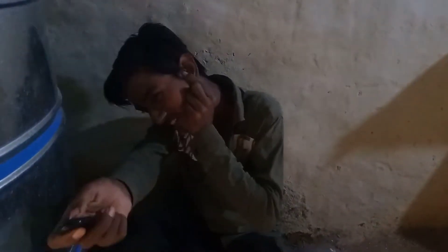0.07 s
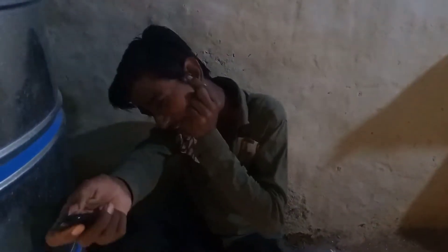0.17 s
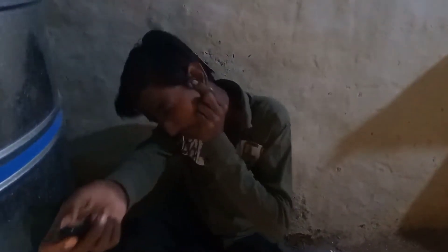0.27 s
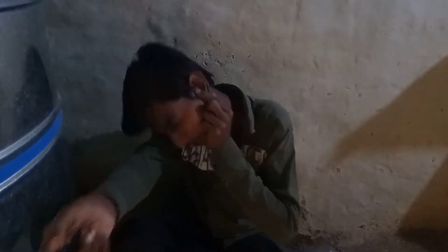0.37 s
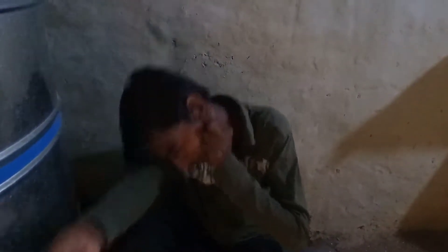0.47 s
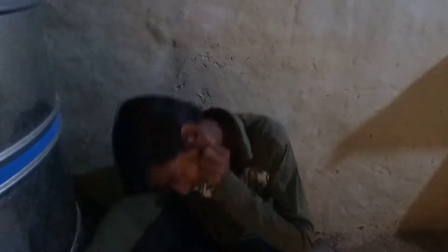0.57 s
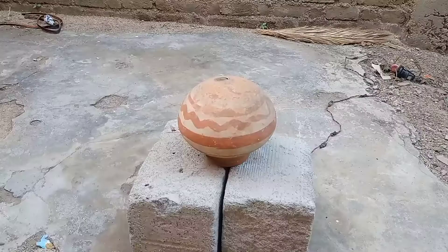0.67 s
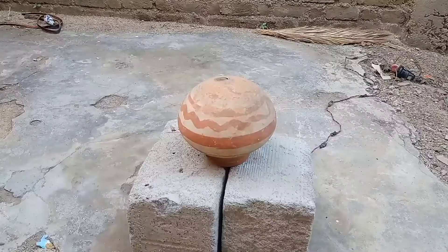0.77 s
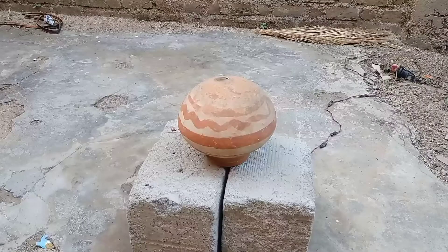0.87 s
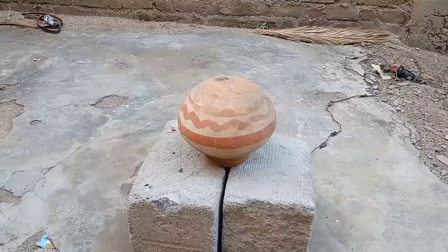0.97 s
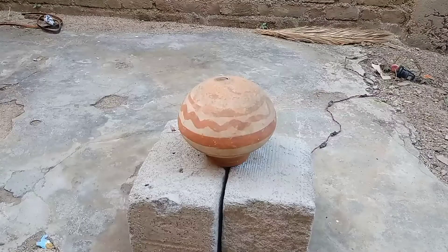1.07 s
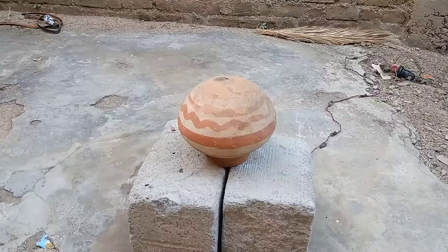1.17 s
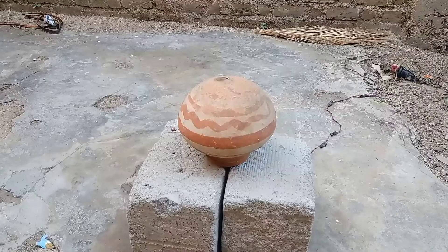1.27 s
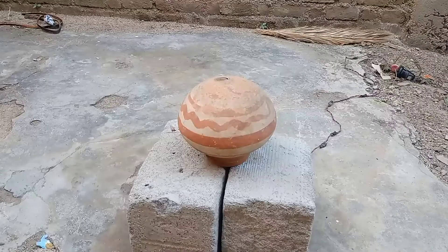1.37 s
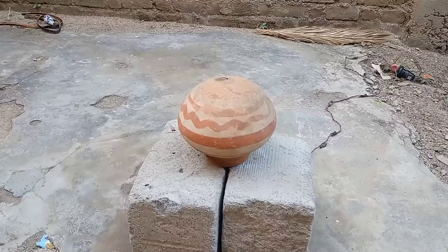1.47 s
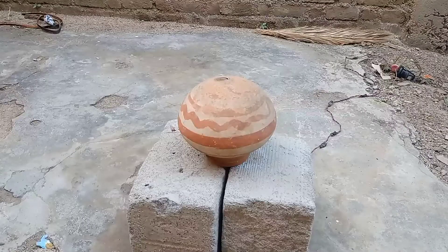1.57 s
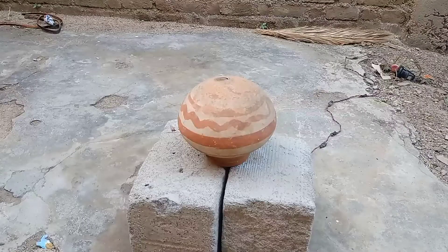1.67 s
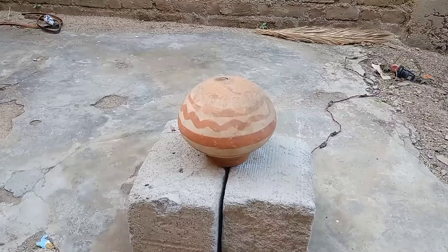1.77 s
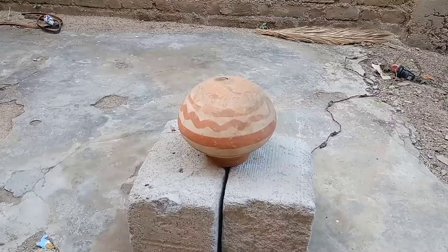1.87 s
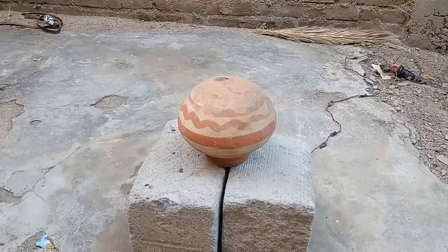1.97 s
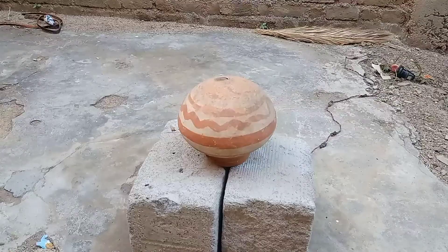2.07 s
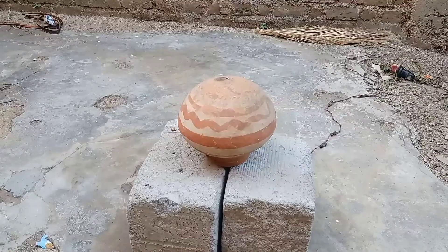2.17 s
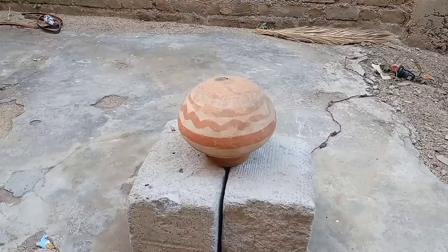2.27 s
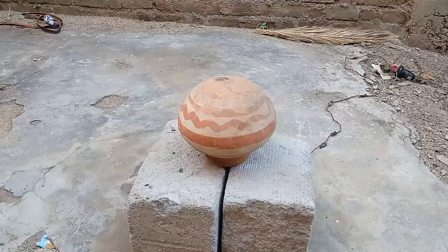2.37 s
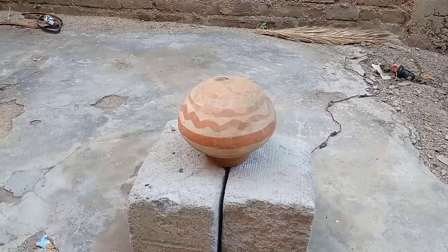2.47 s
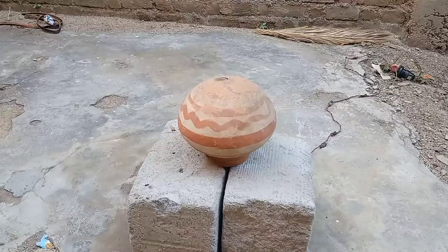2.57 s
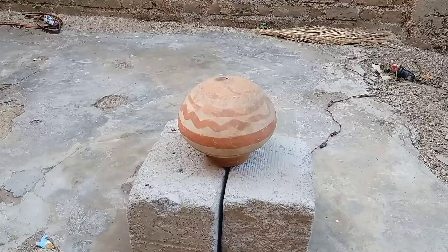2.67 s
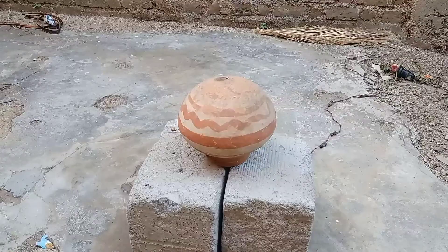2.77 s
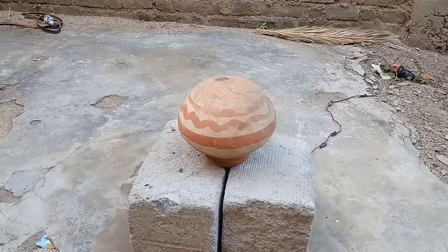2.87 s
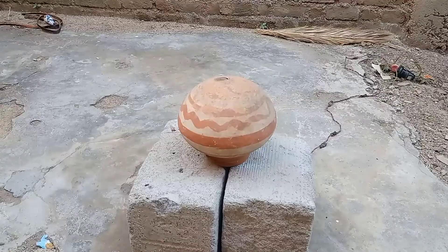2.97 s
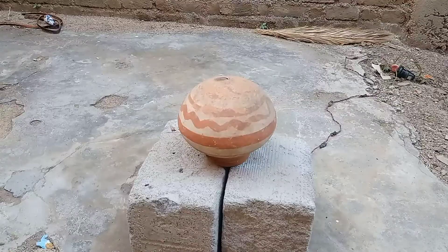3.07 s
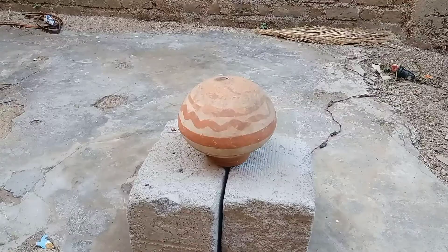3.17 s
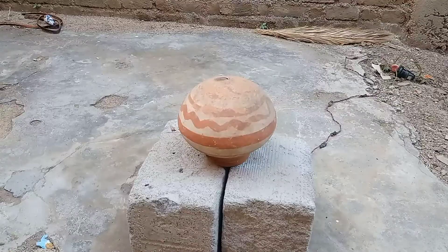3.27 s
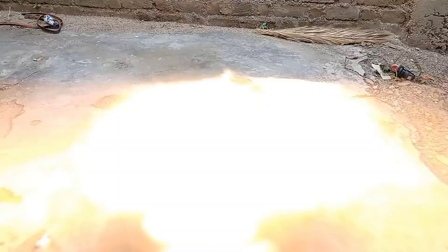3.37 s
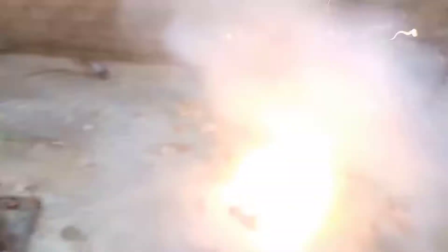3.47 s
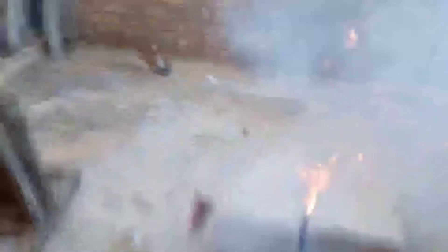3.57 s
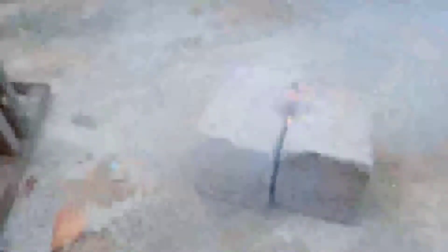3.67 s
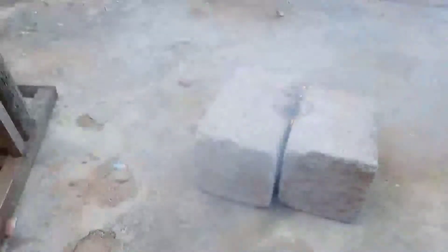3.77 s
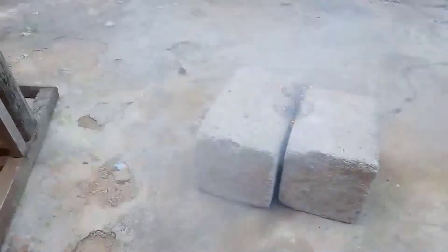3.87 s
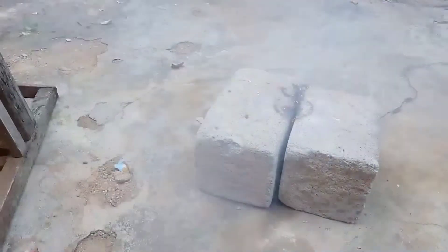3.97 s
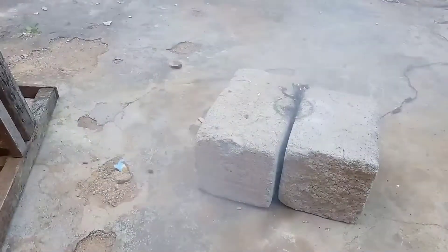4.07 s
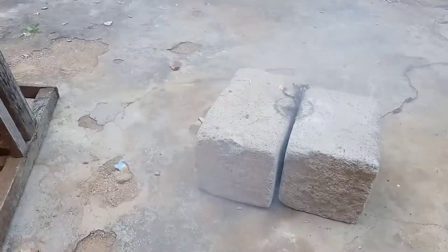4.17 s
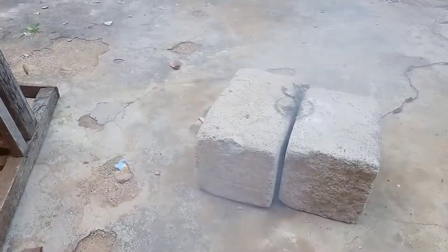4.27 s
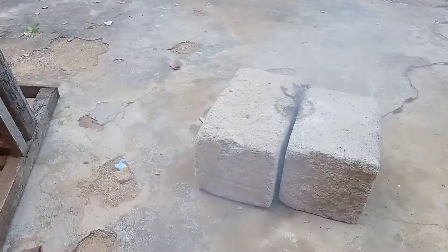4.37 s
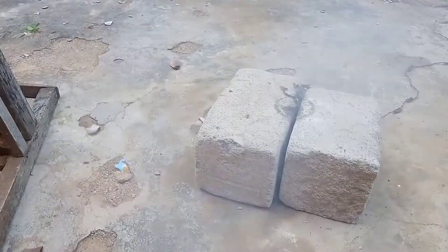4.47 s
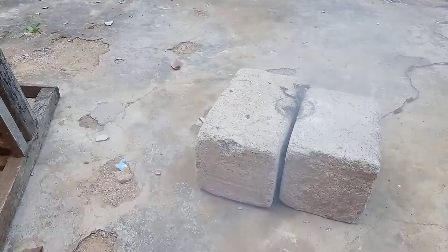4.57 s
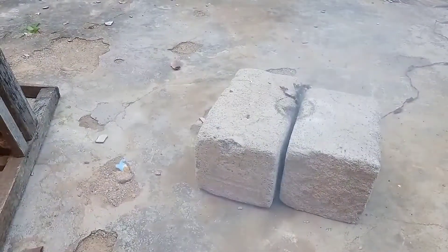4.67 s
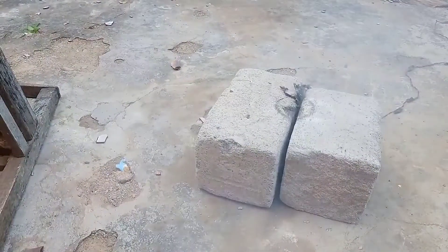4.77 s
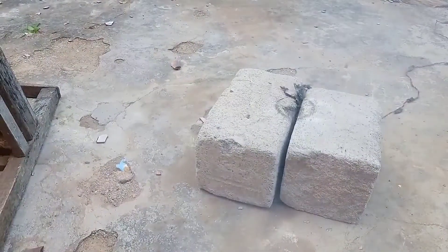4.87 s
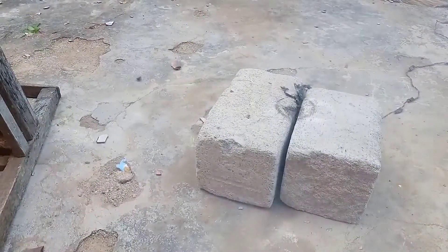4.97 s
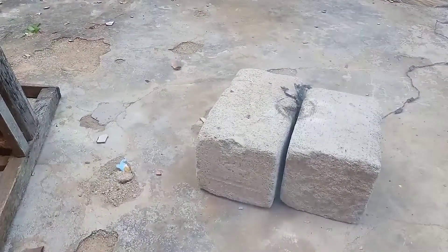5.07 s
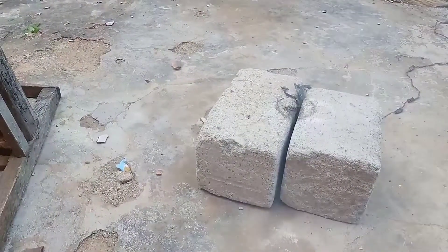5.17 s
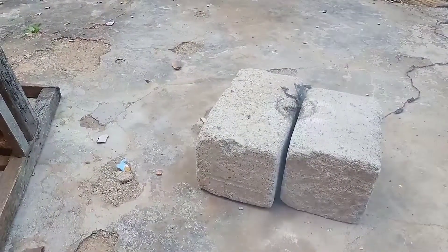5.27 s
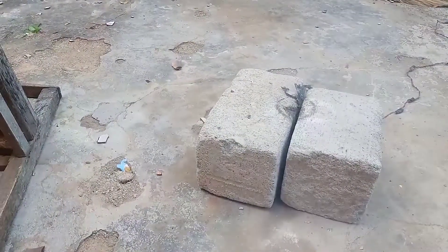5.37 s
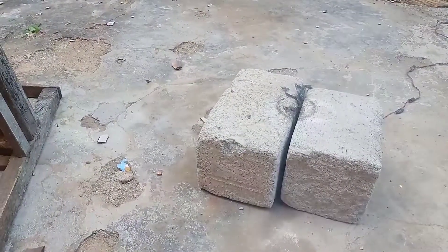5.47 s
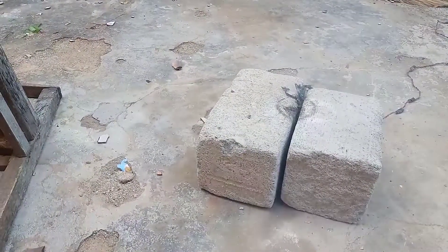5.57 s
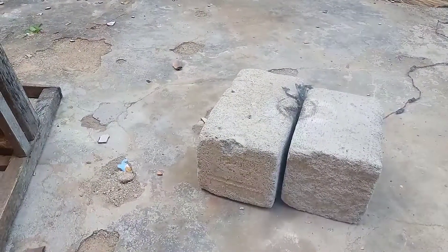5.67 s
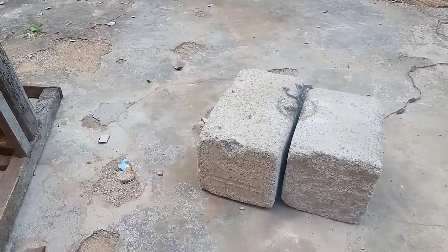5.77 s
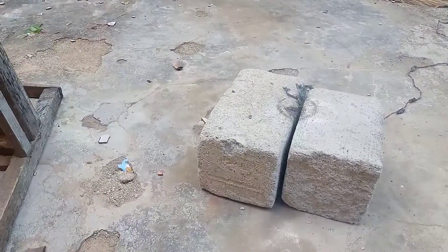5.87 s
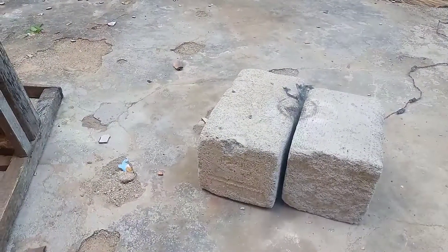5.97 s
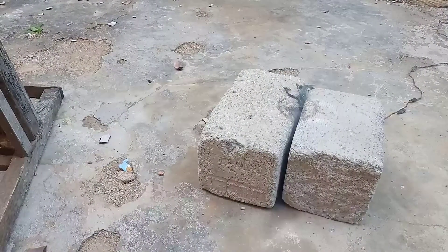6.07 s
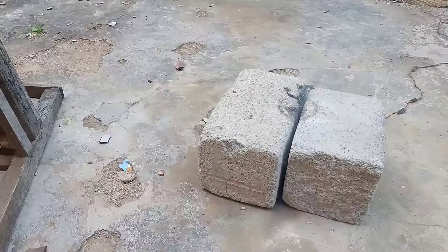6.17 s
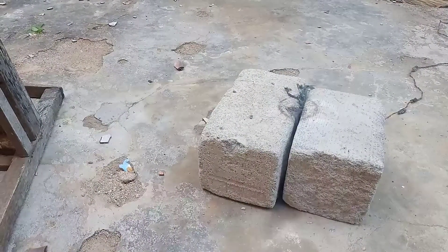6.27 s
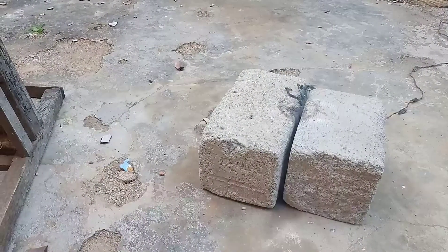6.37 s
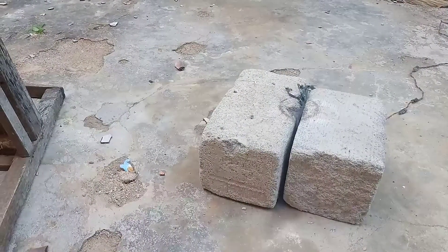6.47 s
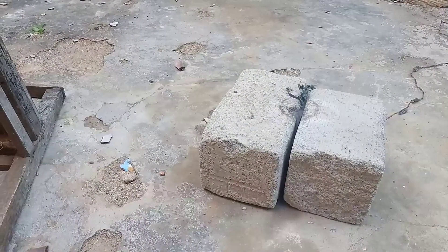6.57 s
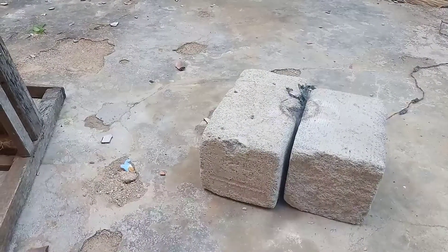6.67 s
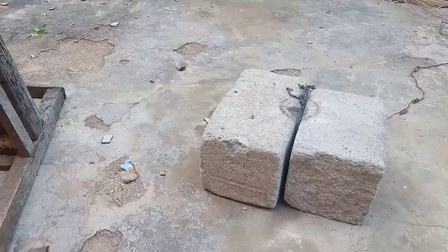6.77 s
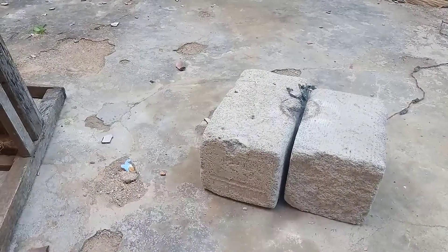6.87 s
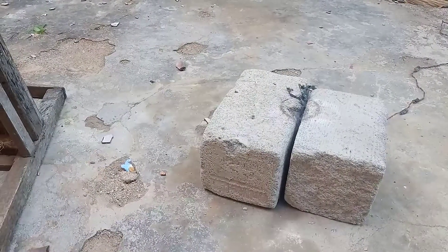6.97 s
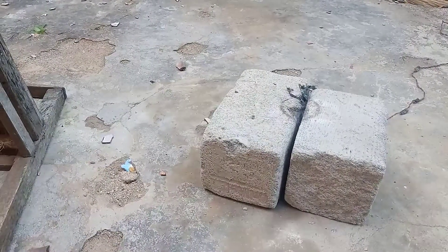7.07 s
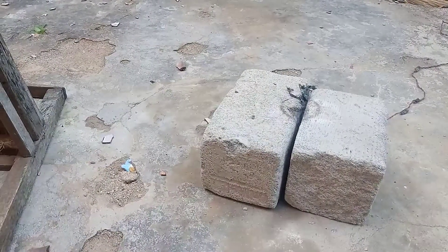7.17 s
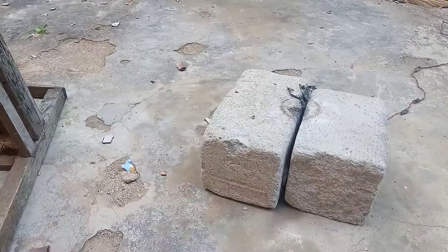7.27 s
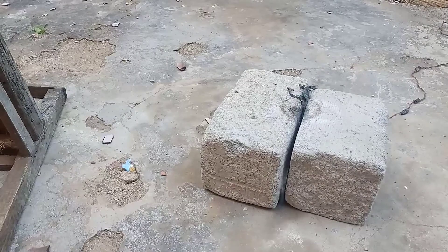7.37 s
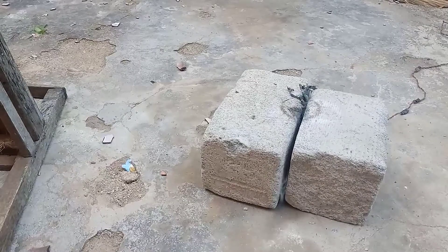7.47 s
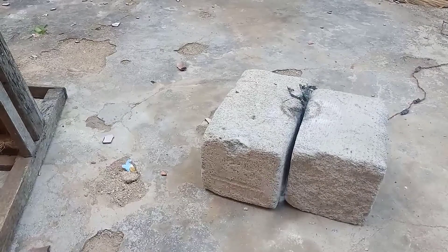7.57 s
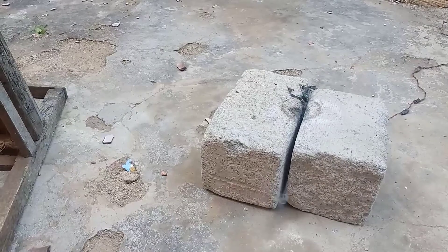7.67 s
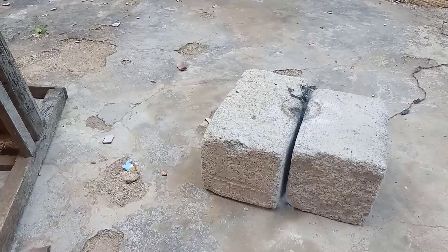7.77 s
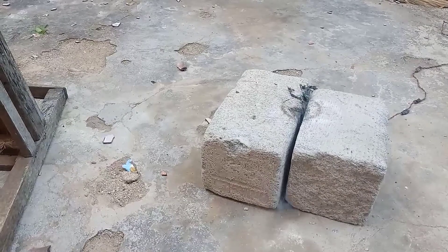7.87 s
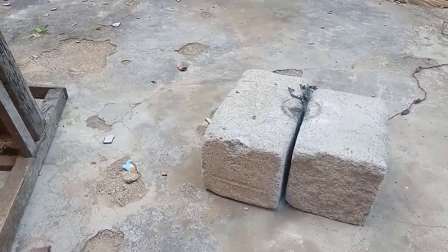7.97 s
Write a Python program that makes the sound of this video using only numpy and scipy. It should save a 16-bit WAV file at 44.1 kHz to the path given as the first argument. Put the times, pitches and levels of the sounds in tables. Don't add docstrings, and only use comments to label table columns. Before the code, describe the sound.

Soft sparrow trills and rubbing cloth for under a second, then an abrupt change to a quiet walled yard with shuffling feet and faint low hums of air in a pipe. A distorted firecracker blast shatters a clay pot, roaring and booming off the walls. Shards skid over concrete and slam a tin roof amid grit and sand, thinning to one last bouncing piece. One fairly close recorder overloads.

```python
import sys
import numpy as np
from scipy import signal
from scipy.io import wavfile
from scipy.ndimage import uniform_filter1d

SR = 44100
rng = np.random.default_rng(int(sys.argv[2]) if len(sys.argv) > 2 else 0)


def to_wav(sig):
    pcm = np.clip(np.atleast_2d(sig), -1, 1) * 32767
    pcm = np.round(pcm).astype(np.int16)
    wavfile.write(sys.argv[1], SR, pcm.T)


def decibels_to_gain(level_db):
    exponent = np.asarray(level_db, float) / 20
    return 10 ** exponent


N = 352888
STEP = 16
T, SLOW_T = np.arange(N) / SR, np.arange(0, N, STEP) / SR
MOVE_S, BLAST_S = .923, 3.549
MOVE = int(MOVE_S * SR)


def rms_one(x):
    return x / np.sqrt(np.mean(x ** 2) + 1e-20)


def level_curve(rows, t=T):
    s, level_db = np.transpose(rows)
    return np.interp(t, s, level_db, -200, -200)


def resonance(x, hz, width_hz):
    r = np.exp(-np.pi * width_hz / SR)
    top = np.array([1, 0, -1]) * (1 - r * r) / 2
    return signal.lfilter(top, [1, -2 * r * np.cos(2 * np.pi * hz / SR), r * r], x + 1e-18)


def hum(air, modes):
    out = 0
    for hz, width_hz, level_db in modes:
        tone = resonance(resonance(air, hz, width_hz), hz, width_hz)
        out = out + decibels_to_gain(level_db) * rms_one(tone)
    return out


def tilt_db(hz, middle_db, lows_db, highs_db, rumble_db):
    rumble = np.clip(np.log(160 / hz) / 0.083, 0, 1)
    low = np.clip(np.log(720 / hz) / 0.21, 0, 1) - rumble
    high = np.clip(np.log(hz / 2700) / 0.8, 0, 1)
    middle = 1 - rumble - low - high
    return middle_db * middle + lows_db * low + highs_db * high + (rumble_db + 6.5) * rumble


def layer_power(level_db, hz, tint):
    return decibels_to_gain(level_db + tilt_db(hz, *tint) - 9) ** 2


def landings(table, hz, rise_s, thud_db):
    power = np.zeros(len(SLOW_T))
    own_db = 2.2 * rng.standard_normal(len(table))
    for (s, peak_db, highs_db, top_hz, t60), extra_db in zip(table, own_db):
        lows_db = thud_db + 10 * np.log2(1500 / top_hz)
        fade_s = max(t60, .01) * (1500 / hz) ** 0.0097
        i = int(s * SR / STEP)
        age = SLOW_T[i:i + int(fade_s * SR / STEP)] - SLOW_T[i]
        focus_db = -4.0 * min(np.log2(hz / top_hz) ** 2, 2.6)
        colour_db = tilt_db(hz, 0, lows_db + 8.5, highs_db + 12.5, lows_db - 8.0)
        level_db = peak_db - 15.0 + extra_db + focus_db + colour_db
        heard = (s > MOVE_S) | (s + age < MOVE_S)
        power[i:i + len(age)] += decibels_to_gain(level_db - 60 * age / fade_s) ** 2 * (1 - np.exp(-age / rise_s)) ** 2 * heard
    return power


def ring_pairs(rows):
    out = np.zeros(N)
    for s, peak_db, hz, t60 in rows:
        age = np.arange(int(t60 * SR)) / SR
        pair = np.sin(2 * np.pi * hz * age) + 0.78 * np.sin(2 * np.pi * hz * 1.045 * age)
        heard = (s > MOVE_S) | (s + age < MOVE_S)
        shape = decibels_to_gain(peak_db - 6.5 - 60 * age / t60) * (1 - np.exp(-age / 0.0008)) * heard
        out[int(s * SR):int(s * SR) + len(age)] += pair * shape
    return out


# time_s, level_db
FAR_FLOCK = [(0.0, -43), (.112, -54.5), (.284, -53), (.48, -56), (.608, -49), (.758, -53), (.868, -58),
             (.9, -64)]


def far_flock():
    modes = [(3220, 740, -1.5), (2020, 350, -5)]   # pitch_hz, width_hz, level_db
    return decibels_to_gain(level_curve(FAR_FLOCK)) * hum(rng.standard_normal(N), modes)


# time_s, level_db
RUSTLE = [(0.0, -49.5), (0.138, -54.5), (0.284, -53.5), (0.514, -56.5), (0.634, -47), (0.738, -39),
          (0.848, -52.5), (0.92, -47)]
# time_s, level_db
YARD_AIR = [(0.93, -56), (1.12, -53.5), (1.24, -37), (1.32, -44.5), (1.5, -55.5), (1.74, -62.5),
            (3.5, -63.5), (5.9, -44.5), (7.2, -61.5), (8.01, -60.5)]
# time_s, level_db
WIND = [(0, -65), (.2, -55), (.55, -62), (.8, -49), (1.3, -59), (1.6, -63), (2.07, -63), (2.3, -54.5),
        (2.64, -61), (3.5, -66), (4.9, -57.5), (5.54, -34.5), (5.9, -58), (7, -73), (8.01, -67)]


def rustle_air_and_wind(hz):
    power = layer_power(level_curve(RUSTLE, SLOW_T), hz, (-1, 0, -19, -20))
    power = power + layer_power(level_curve(YARD_AIR, SLOW_T), hz, (-1.5, -1, -16.5, -5.5))
    return power + layer_power(level_curve(WIND, SLOW_T), hz, (-56, -23, -60, -1))


# start_s, length_s, pitch_hz, level_db
TRILLS = [
    (0.18, 0.078, 2300, -49),
    (0.413, 0.074, 2282, -41),
    (0.677, 0.054, 2286, -37.5),
]
# start_s, length_s, from_hz, to_hz, level_db
SWEEPS = [(0.155, 0.014, 2540, 3650, -48), (0.175, .045, 4650, 4070, -62), (0.213, 0.055, 4050, 2810, -43),
          (0.411, 0.014, 2580, 3730, -41), (0.467, .011, 4110, 3400, -39.5),
          (0.476, 0.052, 4000, 2590, -40), (.673, .013, 2700, 3600, -47), (0.714, .012, 4200, 3700, -48),
          (0.732, 0.012, 3320, 3340, -44), (0.743, 0.048, 3650, 2900, -41.5), (0.49, 0.04, 5400, 4600, -64),
          (0.23, 0.04, 5400, 4900, -66)]


def sparrows():
    notes = [(s, length, hz, .95 * hz, db, .83) for s, length, hz, db in TRILLS]
    notes += [(*row, .15) for row in SWEEPS]
    out = np.zeros(N)
    for s, length, from_hz, to_hz, db, trill in notes:
        age = np.arange(int(length * SR)) / SR
        unsteady_hz = 320 * uniform_filter1d(rng.standard_normal(len(age)), size=60)
        wobble_hz = 100 * trill * np.sin(2 * np.pi * 95 * age) + unsteady_hz
        phase = 2 * np.pi * np.cumsum(from_hz + (to_hz - from_hz) * age / length + wobble_hz) / SR
        shape = np.sin(np.pi * age / length) ** 0.71 * (1 - 0.5 * trill * np.cos(np.pi * 95 * age) ** 2)
        voice = np.sin(phase) + 0.11 * np.sin(phase / 2)
        voice = voice + 0.015 * np.sin(phase * 3 / 2) + 0.012 * np.sin(phase * 2)
        out[int(s * SR):int(s * SR) + len(age)] += decibels_to_gain(db + 4.5) * shape * voice
    out = out + 0.11 * np.roll(out, 530) - 0.09 * np.roll(out, 1150)
    tail_s = np.arange(SR // 4) / SR
    walls = rng.standard_normal(SR // 4) * decibels_to_gain(-34 - 60 * tail_s / 0.26)
    out[:MOVE] += signal.fftconvolve(out[:SR], walls)[:MOVE]
    return out


# start_s, peak_db, pitch_hz, t60_s
KNOCKS = [(3.55, 4, 205, 0.083), (3.748, -41, 13700, 0.25), (3.665, -3, 345, .28), (3.675, -4, 425, .3),
          (3.61, -1, 385, .2), (3.7, -14, 1000, .3), (3.76, -14, 380, .5), (3.635, 7.5, 720, 0.11),
          (4.783, -9, 3280, 0.15), (.27, -46.5, 299.4, 1.2), (.908, -23.5, 494, 0.33), (.912, -30, 870, .1),
          (1.008, -30.5, 1223, 0.07), (1.15, -34, 840, 0.067), (1.238, -33, 286.6, 0.43),
          (1.43, -41.5, 270, 0.3), (2.254, -41, 284.5, 0.66), (2.34, -29.5, 203.4, 0.25),
          (4.128, -6.5, 300, 0.086), (4.9, -6, 767, 0.037), (4.358, -16, 306, 0.076), (3.69, -5, 300, .2),
          (3.66, -5, 500, .3), (3.7, -8, 640, .25), (6.039, -30, 3100, .03), (6.134, -30, 2700, .03),
          (6.297, -34, 3300, .03), (6.32, -36, 2900, .03), (4.87, -12, 310, 0.28), (5.215, -4, 2900, 0.09),
          (5.259, -7.5, 322, 0.023), (3.655, 2, 601, .2), (5.715, -16, 503, 0.21),
          (5.716, -10.5, 942, 0.36), (5.715, -9, 1360, 0.28), (7.5, -41.5, 460, 0.13),
          (3.655, -14, 91, 1.4), (5.78, -10.5, 808, 0.23), (3.925, -14, 2504, 0.22), (1.24, -17, 3200, .04),
          (4.858, -9.5, 377, .2), (4.858, -9, 587, 0.197), (4.862, -13, 228, .15), (5.259, -5.5, 900, .03),
          (5.259, -8, 1900, .03), (4.716, -10, 2200, .05), (4.802, -6, 1100, .02), (4.821, -7, 2000, .03)]


def knocks():
    return ring_pairs(KNOCKS)


# start_s, peak_db, brightness_db, loudest_hz, t60_s
SHUFFLES = [(.549, -27, -11.5, 2640, 0.18), (.772, -26, -17.5, 2730, 0.16), (.896, -19.5, -29, 310, 0.086),
            (.909, -15.5, -30.5, 500, 0.25), (1.009, -48, -33, 1200, .25), (1.148, -26, -32, 765, 0.46),
            (1.235, -16, -20.5, 640, 0.23), (1.41, -38, -33, 301, 0.16), (1.494, -40, -29, 1330, 0.34),
            (1.757, -36, -26, 606, 0.38), (1.879, -39, -28, 466, 0.19), (2.25, -40, -34, 580, 0.75),
            (2.311, -36.5, -29, 784, 0.35), (2.78, -56, -15, 1330, 1), (7.09, -54.5, -37, 179, 0.43),
            (1.045, -49, -12, 3000, .3)]


def shuffles(hz):
    return landings(SHUFFLES, hz, rise_s=0.00032, thud_db=-27.5)


# start_s, peak_db, brightness_db, loudest_hz, t60_s
SKIDS = [(.665, -38, -32, 1200, 0.57), (1.109, -20, -23, 900, 0.3), (3.914, -3, -24.5, 2630, 0.18),
         (4.103, -6.5, -18, 2630, 0.15), (4.17, -0.5, -19.5, 2297, 0.11), (4.466, -15.5, -19, 2350, 1),
         (5.062, -7, -38, 1040, 0.99), (5.521, -5, -22, 1520, 0.26), (5.843, -8.5, -20, 2000, 0.21),
         (6.652, -40, -17, 1836, 1), (7.04, -37, -19, 3280, 0.37)]


def skids(hz):
    return landings(SKIDS, hz, rise_s=0.0079, thud_db=-29.5)


# peak_s, level_db, overblowing_db, fade_db_per_s
PUFFS = [(1.03, -54.5, -3, 40), (1.34, -43, -7.5, 58), (1.529, -41, -12, 200), (1.81, -50, -15, 56),
         (2.09, -48.5, -4, 193), (2.39, -46.5, -12, 148), (2.64, -55.5, -13, 248), (2.8, -54.5, 0.5, 73),
         (2.91, -56, -27, 137), (3.42, -64, -12, 84)]
# time_s, level_db
WHISTLE = [(.93, -92), (1.5, -90), (1.75, -82), (1.95, -91), (2.08, -84), (2.2, -92), (2.38, -80),
           (2.5, -92), (2.74, -95), (2.8, -79), (3.0, -82.5), (3.3, -81), (3.34, -92), (3.549, -92)]
# pitch_hz, width_hz, level_db
PIPE_MIDDLE = [
    (1310, 110, 0),
    (2440, 91, -10.5),
]
# pitch_hz, width_hz, level_db
PIPE_HIGH = [(4690, 140, 0), (5180, 200, 3), (8300, 500, -4), (12000, 600, -8), (13300, 1000, -6)]


def pipe():
    low, middle = 0, 0
    for s, db, over_db, fade in PUFFS:
        puff = decibels_to_gain(db - np.where(T < s, 290 * (s - T), fade * (T - s)))
        low = low + puff
        middle = middle + puff * decibels_to_gain(over_db)
    air = rng.standard_normal(N)
    high = decibels_to_gain(level_curve(WHISTLE))
    out = low * hum(air, [(169, 36, 0.019)])
    out = out + (middle * decibels_to_gain(-2.0) + high * decibels_to_gain(9.0)) * hum(air, PIPE_MIDDLE)
    out = out + high * hum(air, PIPE_HIGH)
    return out * (T > MOVE_S)


# start_s, peak_db, t60_s
SPRAYS = [(3.919, -37, 0.16), (4.108, -27, .25), (4.148, -32, .2), (4.3, -30, 0.43), (4.362, -32, .2),
          (4.446, -31, .4), (4.545, -28, .2), (4.652, -34, 0.35), (4.714, -36, 0.15), (4.782, -27, 0.27),
          (4.863, -38, 0.23), (5.212, -41, .4), (5.308, -32, 0.2), (5.382, -41, 0.21), (5.488, -52, 0.13),
          (5.522, -38.5, 0.26), (5.592, -35, 0.08), (5.709, -44, 0.22), (5.827, -43, .2),
          (5.843, -33, 0.28), (1.575, -66, .15), (1.785, -58, .1)]


def sprays(hz):
    s, db, t60 = np.transpose(SPRAYS)[:, :, None]
    age = (SLOW_T - s).clip(0)
    share = np.clip(np.log2(hz / 5500) / .6 + .5, 0, 1)
    level = decibels_to_gain(db - 7.5 - 60 * age / t60) * (1 - np.exp(-age / .002))
    return share ** 2 * np.sum(level ** 2, axis=0)


# start_s, peak_db, pitch_hz
CHIPS = [(1.5794, -56, 8000), (1.7848, -42, 8000), (3.7384, -17, 7000), (3.7983, -23, 6000),
         (3.852, -26, 12000), (3.867, -22, 4500), (3.8921, -18, 13000), (3.918, -23, 6000),
         (4.0023, -28, 8000), (4.0178, -19, 8000), (4.1111, -14, 8000), (4.1754, -18, 8000),
         (4.2084, -19, 8000), (4.2484, -22, 8000), (4.3575, -15, 8000), (4.4169, -23, 8000),
         (4.4458, -19, 7990), (4.4717, -10, 8000), (4.5491, -3, 6500), (4.553, -19, 13000),
         (4.59, -24, 12000), (4.661, -22, 9000), (4.7137, -13, 5000), (4.718, -18, 10000),
         (4.736, -24, 13000), (4.7541, -9, 5500), (4.7565, -12, 11000), (4.7812, -10, 7980),
         (4.827, -25, 13000), (4.9666, -18, 4000), (5.0712, -28, 6000), (5.1716, -14, 9500),
         (4.0185, -11, 2500), (4.1285, -2, 1200), (4.153, -3, 2500), (4.258, -6, 1500), (4.448, -10, 2800),
         (4.8015, -3, 1500), (5.2595, -2, 1300), (5.3055, -2, 2500), (5.377, -1, 1500), (5.201, -35, 12000),
         (5.227, -28, 12000), (5.3082, -18, 8000), (5.386, -22, 7000), (5.489, -34, 9000),
         (5.5235, -25, 9000), (5.5302, -22, 7960), (5.596, -26, 12000), (5.713, -29, 8000),
         (5.7307, -22, 5000), (5.8275, -27, 6000), (5.8435, -24, 10000), (5.852, -18, 11000),
         (6.0385, -40, 7000), (6.0899, -38, 6000), (6.134, -42, 8000), (6.1408, -40, 8000),
         (6.2964, -41, 6000), (6.3899, -32, 8000), (6.4885, -46, 5000)]


def chips():
    out, age = np.zeros(N), np.arange(300) / SR
    grit = rng.standard_normal((27, 300))
    for (s, peak_db, hz), burst in zip(CHIPS, np.tile(grit, (3, 1))):
        click = (age == 0) + .12 * burst * np.exp(-age / 0.0012)
        click = resonance(resonance(click, hz, 1.3 * hz), hz, 1.3 * hz)
        out[int(s * SR):int(s * SR) + 300] += decibels_to_gain(peak_db - 4.0) * click / np.abs(click).max()
    return out


def after_blast(hold_s, fall_db_per_s):
    fall_db = fall_db_per_s * np.maximum(SLOW_T - BLAST_S - hold_s, 0)
    return np.where(SLOW_T < BLAST_S, -200, -fall_db)


def blast(hz, clumps):
    roar_fall = tilt_db(hz, 230.6, 166, 150, 110.2)
    dust_db = after_blast(1, 207.5) + 2.5 * clumps
    power = layer_power(after_blast(0.098, roar_fall), hz, (-2, -2.5, -25, -20))
    power = power + layer_power(after_blast(0, 17.5), hz, (-43, -17.5, -57.5, -31))
    return power + layer_power(dust_db, hz, (-64.5, -92.5, -41, -90.5))


# time_s, level_db
BOOM = [(3.6, -30), (3.625, -2), (3.655, -0.5), (3.728, 0), (3.742, -9), (3.8, -13), (3.83, -22),
        (4.0, -36), (4.2, -84)]
# pitch_hz, level_db, width_hz
BOOM_MODES = [
    (209, 0, 1.5),
    (156, -12, 2),
    (89, -21, 4),
    (410, -17, 15),
]


def boom():
    drop = (1 - np.tanh((T - 3.642) / .005 / 2)) / 2
    slide = np.cumsum(1 + .85 * drop) / SR
    out = 0
    for hz, level_db, width_hz in BOOM_MODES:
        wander = np.cumsum(rng.standard_normal(N)) * np.sqrt(2 * np.pi * width_hz / SR)
        out = out + decibels_to_gain(level_db) * np.sin(2 * np.pi * hz * slide + wander)
    lows = signal.butter(2, 500, fs=SR, output="sos")
    return decibels_to_gain(level_curve(BOOM)) * signal.sosfilt(lows, out)


# time_s, level_db
GRIT_RAIN = [(3.7, -25), (4.18, -24), (4.34, -29), (4.58, -36), (4.91, -25), (5.64, -23.5), (5.87, -56),
             (6.06, -36), (7.16, -72)]


def grit_rain(hz):
    return layer_power(level_curve(GRIT_RAIN, SLOW_T), hz, (-1, -11.5, -30, -35))


# start_s, peak_db, brightness_db, loudest_hz, t60_s
SHARDS = [(3.738, -5, -19, 689, .11), (3.798, -23, -13.5, 2880, 0.82), (4.019, -22, -13, 2560, 0.76),
          (4.125, -5.5, -30, 750, 0.068), (4.252, -12, -18, 740, 0.17), (4.284, -14.5, -14, 2270, 0.66),
          (4.348, -8.5, -25, 2170, 0.13), (4.417, -19.5, -20, 2170, 0.14), (4.447, -21.5, -6, 2200, .21),
          (4.712, -16, -18, 2340, 0.2), (4.8, -6, -20.5, 900, 0.09), (4.818, -5.5, -36, 2174, 0.95),
          (4.967, -18, -22, 960, 0.26), (5.256, 0, -34.5, 1500, 0.1), (5.488, -16, -50, 1435, 0.75),
          (5.826, -14, -34, 2080, 0.12), (6.095, -20, -33, 1720, 0.097), (6.359, -47, -4, 1560, 0.37),
          (7.5, -54, -19, 898, 0.12), (7.623, -33, -22, 2340, 0.24)]


def shards(hz):
    return landings(SHARDS, hz, rise_s=0.00087, thud_db=-17.5)


# start_s, peak_db, brightness_db, loudest_hz, t60_s
CRASHES = [(3.965, -16, -26, 2720, 0.37), (4.148, -3.5, -23.5, 2006, 0.42), (4.566, 1, -32.5, 1603, 0.43),
           (4.575, -18.5, -39, 700, 0.4), (4.646, -4, -30.5, 2004, 0.53), (4.776, -5.5, -12.5, 3410, 0.25),
           (4.857, 1, -40, 1497, 0.29), (5.212, -10.5, -32.5, 2820, 1), (5.305, 1, -31, 1283, .45),
           (5.376, 0, -31, 1272, 0.22), (5.714, -6.5, -42.5, 1450, 0.99), (5.733, -2.5, -35, 960, 0.11),
           (6.152, -28.5, -27, 1970, 0.85), (6.43, -23, -53, 2370, 0.25), (6.498, -22.5, -47.5, 1736, 0.39),
           (7.1, -43, -20, 1910, 0.47), (7.429, -43, -20, 2510, .77)]


def crashes(hz):
    return landings(CRASHES, hz, rise_s=0.0005, thud_db=-18)


# start_s, peak_db, low_hz, middle_hz, high_hz
CLANGS = [(4.153, -3, 1120, 2020, 2520), (4.567, -1, 743, 1630, 2240), (4.646, -2, 867, 2100, 2480),
          (4.782, -5, 929, 2200, 3250), (4.857, -1, 1060, 1640, 2520), (5.216, -8, 1270, 2200, 2920),
          (5.306, -1, 837, 1590, 2850), (5.376, -1, 1190, 1700, 2310), (5.528, -9, 1030, 1480, 2250),
          (5.714, -6, 840, 1370, 2330), (5.732, -5, 929, 1430, 2370), (5.843, -10, 877, 1300, 2330),
          (6.433, -26, 988, 1760, 2370), (6.498, -24, 1270, 1760, 2600)]


def shard_rings():
    rows = []
    for s, peak_db, highs_db, top_hz, t60 in CRASHES + SHARDS[:-2]:
        for spread, level, life, late in rng.random((4, 4)):
            if min(abs(s - clang[0]) for clang in CLANGS) > .007:
                hz = top_hz * 2 ** (1.25 * spread - .8)
                rows.append((s + 0.037 * late, peak_db - 11.5 - 8 * level, hz, t60 * (0.39 + 0.32 * life)))
    for s, db, *modes in CLANGS:
        for hz, own_db in zip(modes, (-10, -10.5, -9)):
            rows.append((s, db + own_db, hz, .14))
    return ring_pairs(rows)


# pitch_hz, level_db, width_hz
LAST_PIECE = [(1455, -9, 100), (1852, -14, 120), (2230, 1, 150), (2719, -12, 110), (3080, -5.5, 150),
              (3770, -12, 170), (5000, -27, 300), (7900, -17, 700), (620, -19, 190)]


def last_piece():
    start_s, level_db = 7.623, -25.5
    out, age = np.zeros(N), np.arange(SR // 3) / SR
    for (hz, db, width_hz), grit in zip(LAST_PIECE, rng.standard_normal((len(LAST_PIECE), len(age)))):
        echo = decibels_to_gain(-11 - 60 * age / .25 * (1 + 0.34 * np.log2(hz / 2200) ** 2))
        bounce = decibels_to_gain(-10 - 60 * np.abs(age - .036) / .02)
        strike = 2.2 * (age < .0001)
        shake = (grit * (bounce + echo) + strike) * np.sqrt(SR / width_hz)
        ring = resonance(resonance(shake, hz, width_hz), hz, 3 * width_hz)
        out[int(start_s * SR):][:len(age)] += decibels_to_gain(level_db + db - 5.5) * ring
    return out


def contacts(per_s, spread_db, smooth):
    sizes = decibels_to_gain(spread_db * np.minimum(rng.exponential(1, (2, N)), 4)) * rng.choice([-1, 1], (2, N))
    clicks = rms_one(sizes * (rng.random((2, N)) < per_s / SR))
    return rms_one(clicks + smooth * rng.standard_normal((2, N)))


# pitch_hz, level_db
COLOUR = [(40, -29), (90, -1), (140, -6), (300, -1.5), (700, -2.5), (1500, -2.5), (2800, 1), (4000, 2),
          (6200, -1), (8000, 0), (10500, -10), (13500, -5.5), (15500, -3)]


def debris():
    rattle = contacts(per_s=1600, spread_db=4.0, smooth=0.65)
    crackle = contacts(per_s=1200, spread_db=2.8, smooth=0.85)
    clumps = rms_one(uniform_filter1d(rng.standard_normal(len(SLOW_T)), size=25))
    colour_hz, colour_levels = np.transpose(COLOUR)
    edges, out = 36 * 2 ** (np.arange(27) / 3), np.zeros(N)
    for k, (low, high) in enumerate(zip(edges, edges[1:])):
        hz = np.sqrt(low * high)
        power = rustle_air_and_wind(hz) + blast(hz, clumps) + grit_rain(hz)
        power = power + shuffles(hz) + skids(hz) + shards(hz) + crashes(hz)
        if hz > 4000:
            power = power + sprays(hz)
        flicker = uniform_filter1d(rng.standard_normal(len(power)), size=50)
        flicker = rms_one(uniform_filter1d(flicker, size=50))
        colour_db = np.interp(np.log(hz), np.log(colour_hz), colour_levels)
        height = np.sqrt(power * SR / 2 / (high - low)) * decibels_to_gain(colour_db + 1.5 * flicker)
        grains = crackle if hz > 2500 else rattle
        shake = np.repeat(height, STEP)[:N] * grains[k % 2]
        band = signal.butter(2, [low, high], "band", fs=SR, output="sos")
        out[:MOVE] += signal.sosfilt(band, shake[:MOVE])
        out[MOVE:] += signal.sosfilt(band, shake[MOVE:])
    return out


def yard_echoes(x):
    out = x
    for k, lag in enumerate((SR * rng.uniform(.003, .07, 14)).astype(int)):
        out = out + decibels_to_gain(-12.5 - 150 * lag / SR) * (-1) ** k * np.roll(x, lag)
    return out


def scene():
    rings = knocks() + shard_rings()
    rings[MOVE:] = yard_echoes(rings[MOVE:]) * 0.8
    birds = far_flock() + sparrows()
    return (birds + debris() + rings + pipe() + chips() + boom() + last_piece())[None]


# pitch_hz, width_hz, share_added
MIC_PEAKS = [
    (7720, 1400, .9),
    (13500, 2400, .7),
    (6100, 1200, -0.31),
    (10300, 1500, -0.23),
]


def microphone(x):
    return x + sum(share * resonance(x, hz, width_hz) for hz, width_hz, share in MIC_PEAKS)


# from_s, to_s, depth_db
GATES = [(3.75, 3.797, 5), (4.82, 4.853, 10), (4.88, 4.962, 7), (5.265, 5.304, 4), (5.42, 5.486, 13),
         (5.492, 5.52, 7), (5.63, 5.708, 7), (5.765, 5.84, 8), (5.9, 6.03, 7)]


def gate(x):
    sink_db = sum(-db * np.clip((T - a) / .035, 0, 1) * (T < b) for a, b, db in GATES)
    sink_db = uniform_filter1d(sink_db, size=100)
    lows = signal.sosfiltfilt(signal.butter(2, 7500, fs=SR, output="sos"), x)
    return lows + (x - lows) * decibels_to_gain(sink_db)


# landing_s, depth_db, lead_s
DUCKS = [
    (4.855, 16, 0.042),
    (5.305, 16, 0.032),
    (5.3, 2, 0.071),
]


def limiter(x):
    duck_db = np.zeros(N)
    for s, depth_db, lead in DUCKS:
        duck_db -= depth_db * np.clip(1 - (s - T) / (2 * lead), 0, 1) ** 1.48 * (T < s)
    return x * decibels_to_gain(duck_db)


def overload(x, ceiling, hardness):
    return x / (1 + np.abs(x / ceiling) ** hardness) ** (1 / hardness)


def roll_off(x):
    return signal.sosfilt(signal.butter(12, 16500, fs=SR, output="sos"), x)


def record(dry):
    x = limiter(gate(microphone(dry)))
    x = signal.sosfilt(signal.butter(2, 52, "high", fs=SR, output="sos"), x)
    x = overload(x, 0.89, 6)
    x = signal.sosfilt(signal.butter(2, 42, "high", fs=SR, output="sos"), x)
    x = overload(x, 0.92, 12)
    x = signal.sosfilt(signal.cheby2(14, 60, 16100, fs=SR, output="sos"), x)
    return roll_off(.96 * x)


dry = scene()
out = record(dry)
to_wav(out)
```